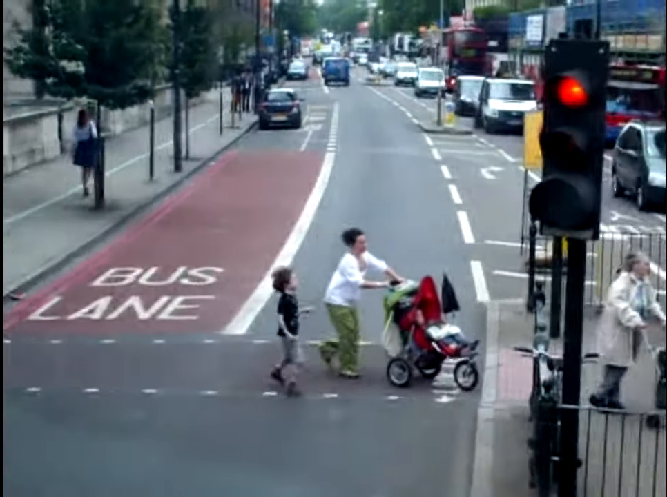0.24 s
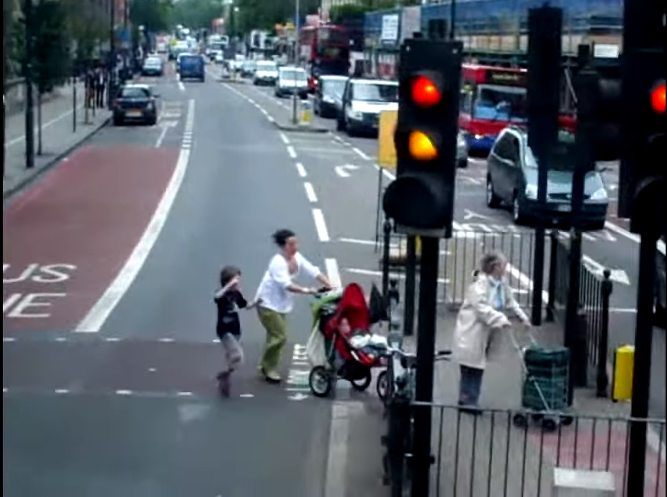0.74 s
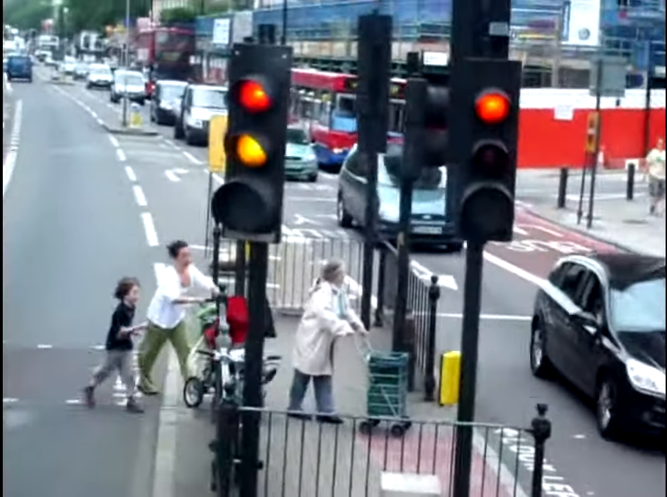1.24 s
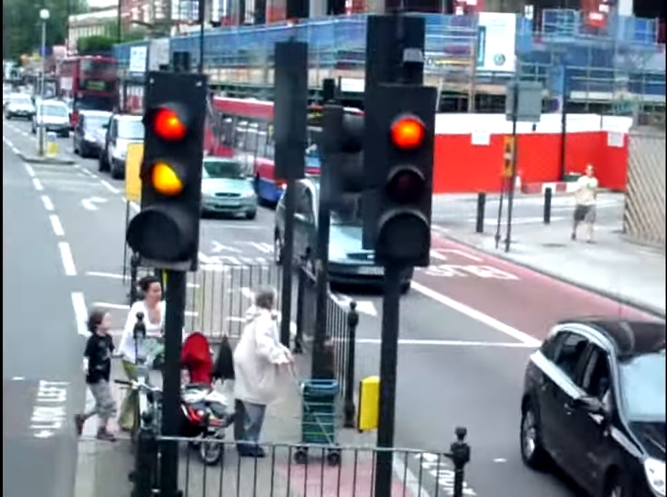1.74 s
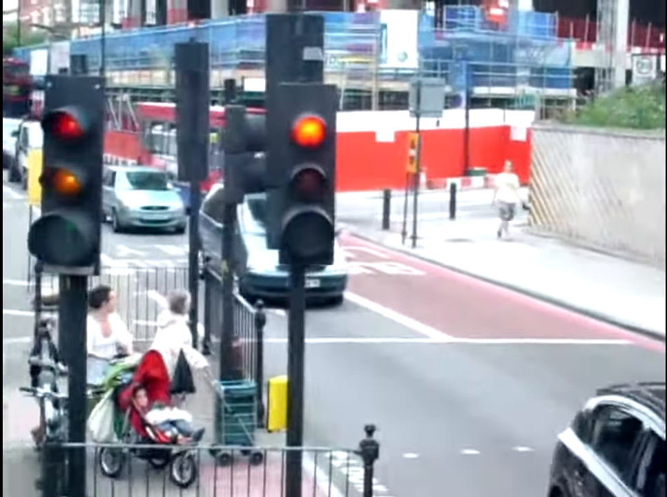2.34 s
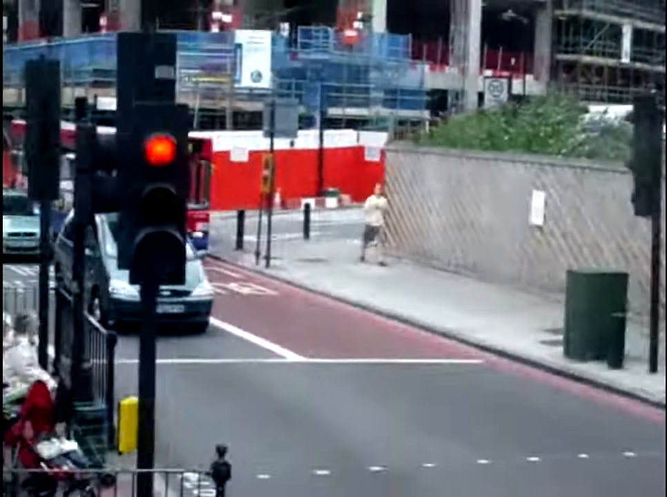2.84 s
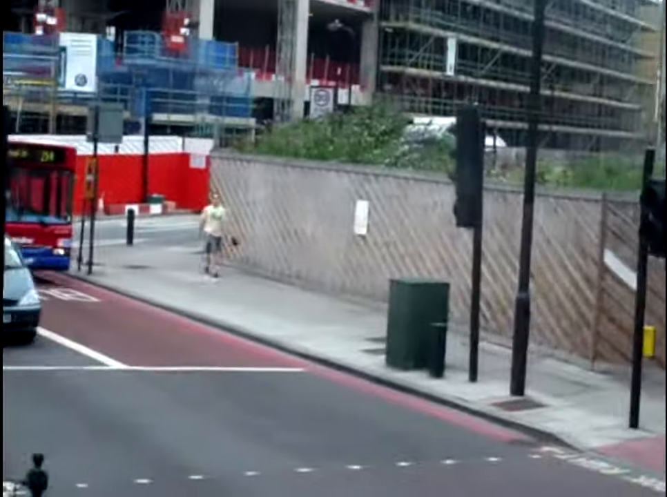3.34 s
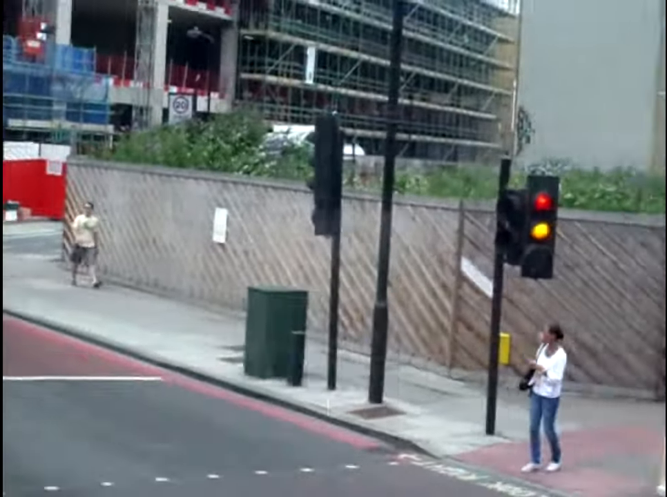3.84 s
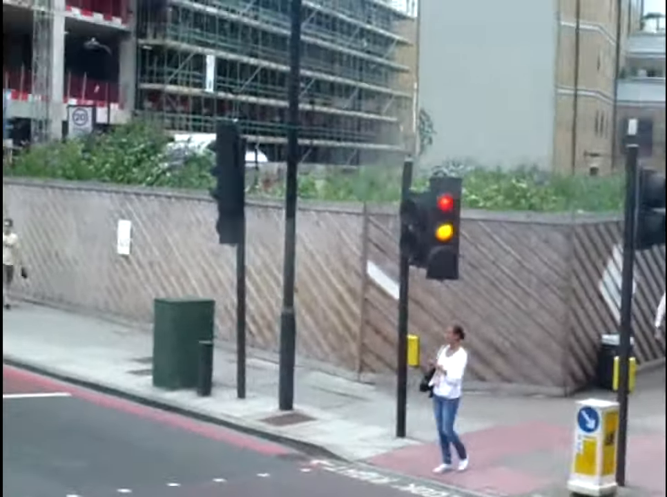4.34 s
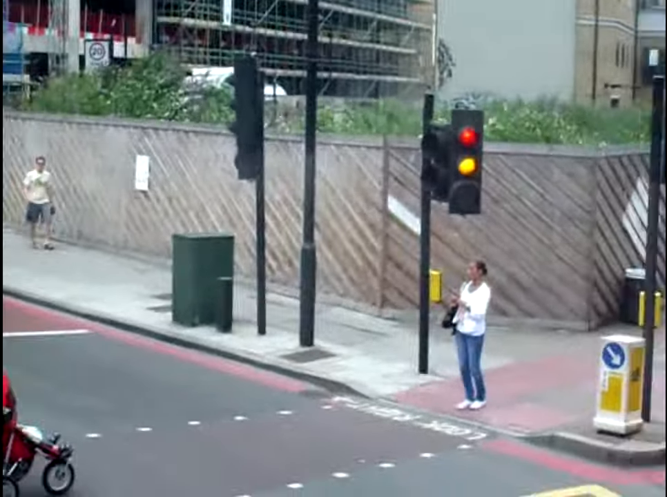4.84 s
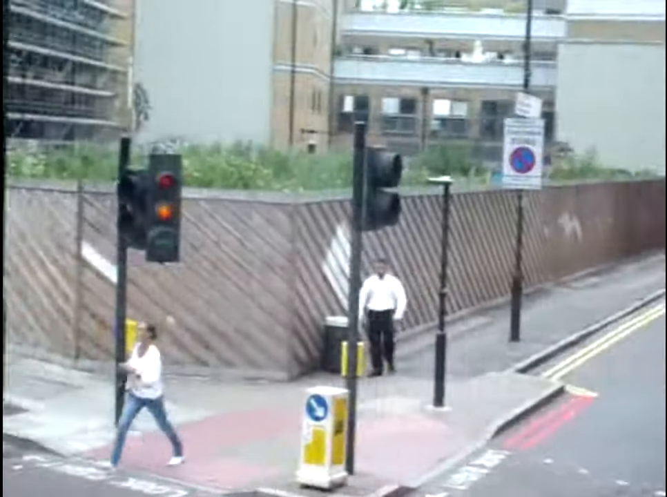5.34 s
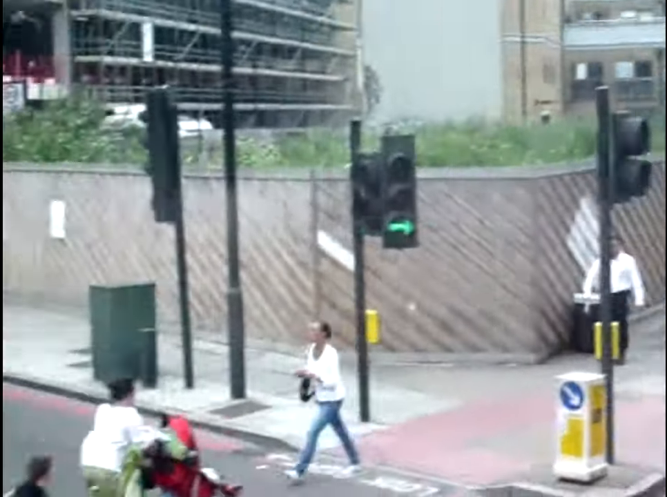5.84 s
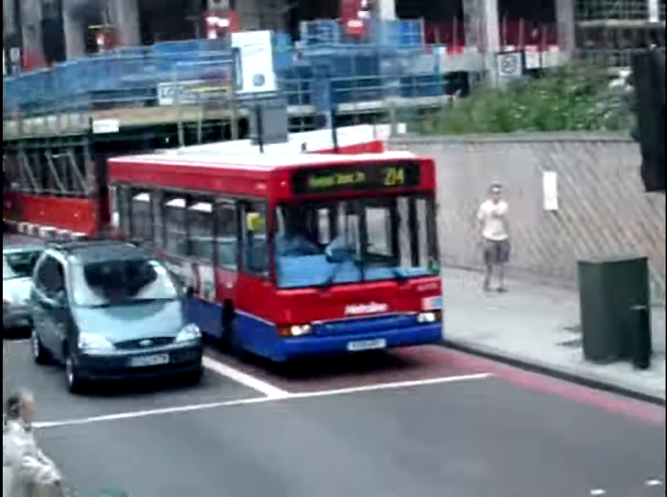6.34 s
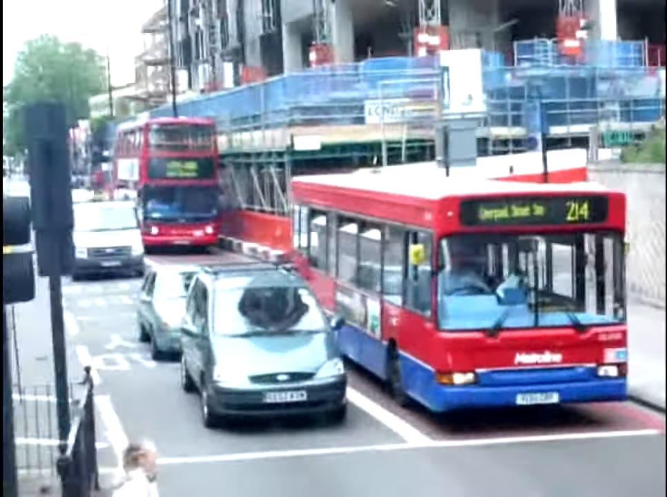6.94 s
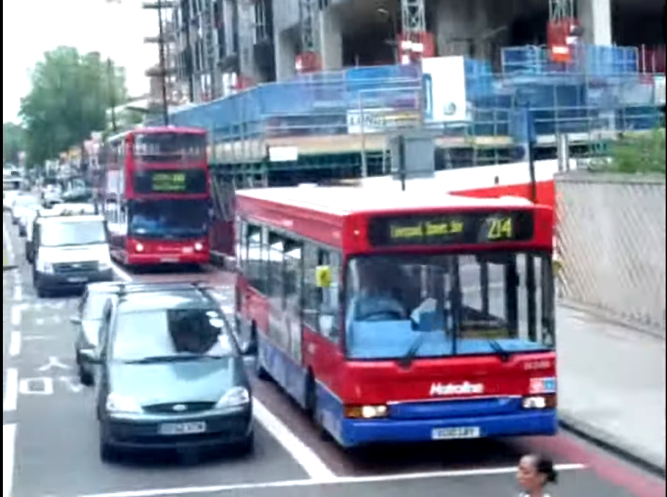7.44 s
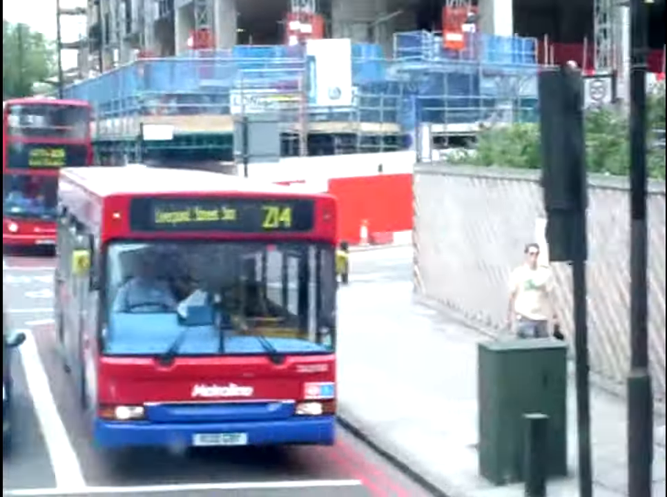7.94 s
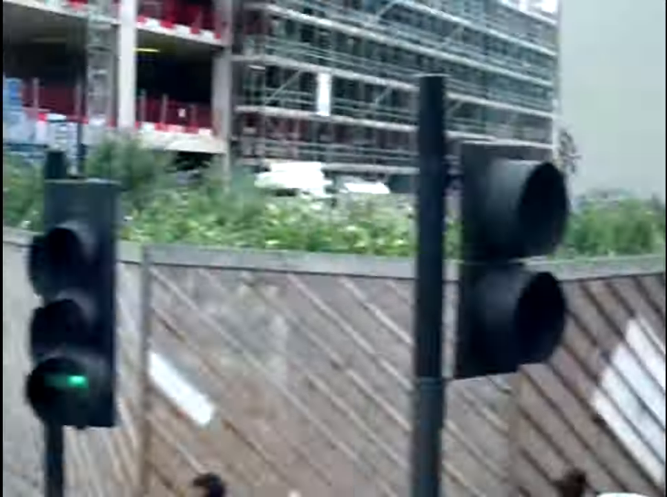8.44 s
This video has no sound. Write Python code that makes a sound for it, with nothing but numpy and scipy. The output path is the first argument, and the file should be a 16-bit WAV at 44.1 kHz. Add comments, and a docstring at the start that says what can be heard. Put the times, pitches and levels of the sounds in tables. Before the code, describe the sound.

Heard from a seat inside a diesel bus at a city junction: a deep throbbing idle with a thin wavering gear whine. The whine breaks up as the bus pulls away, revs climbing steadily, panels buzzing and trim rattling. A vehicle alongside revs twice, street noise swells past, and small brake chirps squeak near the end.

```python
"""On board a diesel bus at city traffic lights: it idles with a thin gear whine, then pulls away and the revs climb.
Sines at multiples of the firing rate make the exhaust, whine and panel buzz; shaped noise makes knocks and roar.
A vehicle alongside, a gliding sine, revs twice and moves off; the body shudders and booms in low noise.
Bursts of noise make rattling trim, ticking fittings and a soft puff; street and tyre noise swells past.
Wavering sines make a street note, squeals, whines and engine hums, and the chirps of a brake near the end."""
import sys
import numpy as np
from scipy import signal
from scipy.fft import rfft, irfft, next_fast_len
from scipy.io import wavfile
from scipy.ndimage import map_coordinates

SR = 44100
rng = np.random.default_rng(int(sys.argv[2]) if len(sys.argv) > 2 else 0)


def unload_wav(signal):
    """Save mono or channel-first audio to the path in sys.argv[1] as 16-bit WAV at rate SR, clipped to [-1, 1]."""
    wavfile.write(
        sys.argv[1],
        SR,
        np.round(np.clip(np.atleast_2d(signal).T, -1, 1) * 32767).astype(np.int16),
    )


N = 383669  # length in samples


def amp(db):
    """Decibels to gain."""
    return 10 ** (np.asarray(db) / 20)


def unit(x):
    """Scaled to rms 1."""
    return x / np.sqrt(np.mean(x ** 2) + 1e-20)


def curves(rows):
    """One value per sample for each column after the time, in straight lines between the rows."""
    s, *columns = np.transpose(rows)
    return [np.interp(np.arange(N) / SR, s, column) for column in columns]


def wobble(rate):
    """A smooth random curve, with rate random points a second."""
    points = rng.standard_normal(int(N * rate / SR) + 4)
    return map_coordinates(points, [np.arange(N) * rate / SR])


def ramp(s, length):
    """A straight rise from 0 to 1 that starts at time s."""
    return np.clip((np.arange(N) / SR - s) / length, 0, 1)


def bump(s, width):
    """A bell of height 1 around time s."""
    return np.exp(-((np.arange(N) / SR - s) / width) ** 2)


def fade(s, t60, attack):
    """A quick rise at time s and an exponential decay, by 60 dB in t60 seconds."""
    t = np.maximum(np.arange(N) / SR - s, 0)
    return (1 - np.exp(-t / attack)) * np.exp(-np.log(1000) * t / t60)


def lift(hz, modes):
    """Decibels that a note gains (or loses) near resonances."""
    return sum(db / (1 + ((hz - centre) / width) ** 2) for centre, width, db in modes)


def coloured(x, points):
    """x through a filter drawn by (Hz, dB) points on a log pitch axis."""
    m = next_fast_len(N + SR // 2)
    f, db = np.transpose(points)
    hz = np.fft.rfftfreq(m, 1 / SR)
    gain = amp(np.interp(np.log(hz + 1), np.log(f), db, left=-120, right=-120))
    return irfft(rfft(x, m) * gain, m)[:N]


def rush(points):
    """Noise of rms 1 whose spectrum has the given shape."""
    return unit(coloured(rng.standard_normal(N), points))


def tone(hz):
    """A sine of rms 1 that follows a pitch curve."""
    return np.sqrt(2) * np.sin(2 * np.pi * (np.cumsum(hz) / SR + rng.random()))


# The first four multiples of the firing rate, before resonances and surges.
# Each row: level in dB at idle, level in dB under load, dB added by the pull from rest.
FIRING_ORDERS = [(-27, -33.5, 0.5), (-34.5, -35.5, -2.5), (-39.5, -50, 3), (-57.5, -60.5, 1.5)]
# Weak notes from unequal cylinders, before the body's lift.
# Each row: multiple of the firing rate, level in dB at idle, level in dB under load.
UNEVEN_ORDERS = [(1 / 3, -42, -38), (1 / 2, -48, -35), (2 / 3, -53, -46), (5 / 6, -48, -48),
                 (3 / 2, -37.5, -44), (5 / 3, -45, -50), (7 / 3, -57, -47), (5 / 2, -44, -48),
                 (10 / 3, -46.5, -54), (7 / 2, -47.5, -54)]
# Air resonances and a null of the cabin. Each row: pitch in Hz, half width in Hz, lift in dB.
CABIN_MODES = [(44.3, 3.8, 8), (56.84, 2.1, 15), (83, 4, -3), (112.1, 3.8, 7), (126.4, 4.2, 5.5),
               (138.36, 3.95, 13), (150.3, 3.2, 10), (178, 6, 5.5), (200.6, 11, 16)]
# The body sways with a weak note near its own. Each row: pitch in Hz, half width in Hz, lift in dB.
BODY_MODE = [(25, 7.8, 9.5)]
# The exhaust note surges and slackens. Each row: middle in seconds, half length in seconds, change in dB.
SURGES = [(3.599, 0.093, 7), (4.094, 0.092, 4), (4.303, 0.14, -4.5), (5.027, 0.11, -4), (5.368, 0.098, 3),
          (7.801, 0.067, -6.5), (8.138, 0.18, 5), (8.71, 0.049, -10.5)]
PULL_S, PULL_WIDTH_S = 4.29, 0.51  # the engine labours hardest as it pulls from rest
CRANK_JITTER_RAD = .08


def exhaust(firing, load):
    """Low firing orders throb as they cross cabin resonances; unequal cylinders add orders between them."""
    crank = 2 * np.pi * np.cumsum(firing) / SR + CRANK_JITTER_RAD * wobble(22)
    surge_db = sum(db * bump(s, width) for s, width, db in SURGES)
    pull = bump(PULL_S, PULL_WIDTH_S)
    out = np.zeros(N)
    for k, (idle_db, load_db, pull_db) in enumerate(FIRING_ORDERS, 1):
        level_db = idle_db + load * (load_db - idle_db) + pull * pull_db
        level_db = level_db + lift(k * firing, CABIN_MODES) + surge_db + .6 * wobble(14)
        out += amp(level_db) * np.sqrt(2) * np.cos(k * crank)
    for order, idle_db, load_db in UNEVEN_ORDERS:
        level_db = idle_db + load * (load_db - idle_db) + lift(order * firing, BODY_MODE)
        out += amp(level_db + 3.8 * wobble(8)) * tone(order * firing)
    return out


# Ring of the engine block under each firing. Each row: pitch in Hz, relative level in dB.
BLOCK_RING = [(120, -38), (220, -2.5), (265, 1.5), (300, -2.5), (350, 0.5), (500, -2), (750, -18.5),
              (1200, -13.5), (3000, -41)]


def block(firing, roar_db, load, scatter_db=3.5, cylinder_db=3, count=6):
    """Each firing knocks the block; strength follows a pattern over six firings, plus random scatter."""
    at = np.flatnonzero(np.diff(np.floor(np.cumsum(firing) / SR)))
    cylinder = np.cos(2 * np.pi * np.arange(len(at)) / count)
    strength_db = cylinder_db * cylinder + scatter_db * rng.standard_normal(len(at))
    knocks = np.zeros(N)
    knocks[at] = amp(strength_db) / np.sqrt(firing[at])
    # the cabin smears every knock over some tens of milliseconds
    t = np.arange(SR // 4) / SR
    smear = rng.standard_normal(len(t)) * np.exp(-t / 0.024)
    ring = signal.fftconvolve(knocks, smear)[:N]
    return amp(roar_db - 10.5 + 0.5 * load) * unit(coloured(ring, BLOCK_RING))


# Combustion roar at idle. Each row: pitch in Hz, relative level in dB per Hz.
ROAR_IDLE = [(70, -27), (120, 1.5), (160, -1.5), (260, -1.5), (300, -4.5), (345, 2), (450, -5), (560, -3),
             (700, -14), (900, -21.5), (1400, -28)]
# Combustion roar under load. Each row: pitch in Hz, relative level in dB per Hz.
ROAR_LOAD = [(70, -19.5), (130, 1.5), (200, -1.5), (260, 2.5), (300, -3), (345, 1), (440, -1.5),
             (520, -2.5), (700, -10), (900, -14), (1400, -34.5)]
# Valve clatter and hiss. Each row: pitch in Hz, relative level in dB per Hz.
HISS = [(900, -28.5), (1500, -0.5), (2100, 3), (2600, -1.5), (3200, -6), (3800, -6.5), (4500, -13),
        (5500, -22), (7000, -28.5), (8000, -38), (10000, -49.5)]


def roar(firing, load, roar_db, hiss_db):
    """Combustion roar and valve clatter pulse with the firings; the roar deepens under load."""
    beat = np.cos(2 * np.pi * np.cumsum(firing) / SR)
    body = np.sqrt(1 - load) * rush(ROAR_IDLE) + np.sqrt(load) * rush(ROAR_LOAD)
    low = amp(roar_db + 0.7 * wobble(9)) * (1 + 0.04 * beat) * body
    high = amp(hiss_db + 0.26 * wobble(12)) * (1 + 0.085 * beat) * rush(HISS)
    return low + high


# Shudder of the body on its springs. Each row: pitch in Hz, relative level in dB per Hz.
SHUDDER = [(8, -21), (16, -6.5), (24, -2), (36, -9.5), (55, -9.5), (110, -23.5), (200, -69.5)]
# Boom of the cabin air. Each row: pitch in Hz, relative level in dB per Hz.
CABIN_BOOM = [(25, -29.5), (42, -10), (52, 6), (60, -8.5), (68, -8.5), (85, -6), (115, -15.5), (150, -29.5),
              (250, -51.5)]
# The body takes a jolt. Each row: start in seconds, level in dB, time to die by 60 dB in seconds.
JOLTS = [(4.2, -35, 1.97), (5.3, -18.5, 1.6), (8.019, -22.5, 2.5)]
# The boom swells near this firing rate. Each row: firing rate in Hz, half width in Hz, lift in dB.
BOOM_SWELL = [(67, 8.1, 6)]
SHUDDER_DB, SHUDDER_REVS_DB = -34.5, 8.5  # at the lowest revs, added at the highest
BOOM_DB, BOOM_REVS_DB = -39, 9.5  # likewise, before the swell


def bodywork(firing):
    """The body shudders on its springs and the cabin air booms, both more as the revs climb."""
    revs = (firing - firing.min()) / np.ptp(firing)
    jolts = sum(amp(db) * fade(s, t60, attack=.02) for s, db, t60 in JOLTS)
    shudder = amp(SHUDDER_DB + SHUDDER_REVS_DB * revs) + jolts
    boom_db = BOOM_DB + BOOM_REVS_DB * revs + lift(firing, BOOM_SWELL)
    return shudder * rush(SHUDDER) + amp(boom_db) * rush(CABIN_BOOM)


# Cabin panels that ring with the higher firing orders. Each row: pitch in Hz, relative level in dB.
PANELS = [(130, -10.5), (165, -15), (200, -6), (225, -9.5), (258, -2), (280, -5.5), (305, -22), (328, -14),
          (352, -9), (395, -10), (440, -5.5), (490, -13.5), (535, -6), (580, -9), (660, -13.5), (800, -17)]
PANEL_FLUTTER = .002  # as a share of the pitch


def panels(firing, roar_db, order=4, count=9):
    """Higher firing orders flare up raggedly as they cross the panel resonances."""
    buzz = np.zeros(N)
    for k in range(order, order + count):
        hz = k * firing * (1 + PANEL_FLUTTER * wobble(40))
        buzz += amp(2.5 * wobble(12)) * tone(hz)
    return amp(roar_db - 10) * coloured(buzz, PANELS)


# The gear whine dies away as the bus starts to roll. Each row: time in seconds, level in dB before its waver.
WHINE = [(0, -46), (0.95, -42), (1.4, -44.5), (1.85, -42.5), (2.2, -39), (2.55, -44.5), (2.85, -42.5),
         (3.02, -50), (3.13, -45), (3.23, -49), (3.37, -40.5), (3.46, -54), (4, -75)]
WHINE_WAVER_DB, WHINE_GRIT_DB = 1.4, 1.3  # slow and fast random changes in level


def gear_whine(firing, load, order=23):
    """A gear sings at a fixed multiple of the firing rate; it wavers, and breaks up as it takes the load."""
    whine_db, = curves(WHINE)
    waver_db = WHINE_WAVER_DB * wobble(15) + WHINE_GRIT_DB * wobble(66)
    flutter = 0.0022 * wobble(30) + 0.015 * load * wobble(70)
    return amp(whine_db + waver_db) * tone(order * firing * (1 + flutter))


# Street noise. Each row: pitch in Hz, relative level in dB per Hz.
STREET = [(300, -17.5), (550, -2.5), (700, 5), (860, 0), (990, -0.5), (1080, 1), (1180, -5), (1400, -5.5),
          (1600, -11), (1900, -14.5), (2800, -33.5), (3900, -28.5), (5500, -43), (7000, -52.5)]
# A wavering street note comes and goes. Each row: start in seconds, length in seconds, peak dB before waver.
DRONE = [(3.8, 0.11, -37.5), (4.05, .3, -43), (4.4, .3, -37), (4.674, 0.12, -31.5), (4.761, 0.39, -38.5),
         (5.1, .28, -38), (5.36, 0.37, -36), (5.8, 0.41, -45), (6.104, 0.11, -42)]
GRAIN_DB = 0.94  # coarse grain of the traffic when it is close


def street(street_db, traffic):
    """Traffic noise swells past, coarser when close, with a wavering note in it."""
    swells = sum(amp(db) * np.sin(np.pi * ramp(s, length)) for s, length, db in DRONE)
    drone = swells * amp(1.3 * wobble(30)) * tone(756 + 5 * wobble(60))
    grain_db = GRAIN_DB * traffic * wobble(140)
    return drone + amp(street_db + 0.55 * wobble(7) + grain_db) * rush(STREET)


# Squeals, whines and engine hums, before flutter. Each row: start in seconds, length in seconds,
# start pitch in Hz, end pitch in Hz, peak level in dB.
SQUEALS_AND_HUMS = [(0.5, 0.44, 1410, 1414, -53.5), (1.093, 0.65, 1440, 1443, -55.5),
                    (1.603, 0.55, 1365, 1423, -53), (2.2, 0.4, 1415, 1413, -58.5),
                    (1.635, 0.26, 2745, 2800, -62), (1.932, 0.38, 2800, 2770, -60),
                    (3.683, 0.37, 258, 289.4, -46.5), (4.582, 0.33, 691, 722, -41.5),
                    (4.85, .85, 1415, 1414, -52), (5.201, 1.1, 2423, 2806, -59),
                    (5.697, 0.357, 695, 671, -42), (5.75, .5, 256, 257.1, -42), (6.071, .36, 725, 684, -44),
                    (6.101, 0.32, 349, 347, -38.5), (6.17, 0.22, 526, 513, -40),
                    (6.5, 0.52, 1345, 1320, -54), (6.55, 0.598, 250, 268.5, -38.5),
                    (7.05, .35, 500, 505, -42.5), (7.49, .42, 159.7, 175.4, -33.5),
                    (7.531, 0.538, 344.5, 324, -39), (7.62, .5, 278, 281.5, -41),
                    (8.021, 0.48, 448, 498, -38.5), (8.296, 0.396, 348, 388.5, -40.5)]


def squeals_and_hums():
    """Squeals, whines and engine hums swell, glide and flutter: sines that bend from one pitch to another."""
    out = np.zeros(N)
    flutter, swell_db = 1 + .006 * wobble(70), 1.5 * wobble(32)
    for s, length, start_hz, end_hz, db in SQUEALS_AND_HUMS:
        u = ramp(s, length)
        hz = (start_hz + u * (end_hz - start_hz)) * flutter
        arch = 2 * np.sqrt(u * (1 - u))
        out += amp(db + swell_db) * arch * tone(hz)
    return out


# Ticks of loose fittings, and one longer soft puff. Each row: start in seconds, level in dB before the fade,
# time to die by 60 dB in seconds, brightness in dB per octave.
TICKS_AND_PUFF = [(2.164, -48, .03, 7.5), (4.287, -31.5, 0.04, -4), (4.296, -41, .03, -4),
                  (4.931, -40.5, 0.02, 8), (6.739, -45, 0.05, -2), (8.125, -45, 0.8, 0.5),
                  (8.244, -42.5, 0.046, 3.5)]
# Their sound before it is made duller or brighter. Each row: pitch in Hz, relative level in dB.
FITTING = [(400, -13.5), (1400, 1.5), (2600, 2), (3900, -6.5), (5500, -14.5), (8000, -40.5), (10000, -59)]
TILT_PIVOT_HZ = 2500  # the pitch that brightness leaves alone


def fittings():
    """Loose fittings tick in short bursts of noise, dull or bright; one longer soft puff comes near the end."""
    out = np.zeros(N)
    for s, db, t60, tilt in TICKS_AND_PUFF:
        tilted = [(hz, level + tilt * np.log2(hz / TILT_PIVOT_HZ)) for hz, level in FITTING]
        out += amp(db) * fade(s, t60, attack=0.0003) * rush(tilted)
    return out


# Exhaust of the vehicle alongside. Each row: time in seconds, firing rate in Hz, level in dB before wobble.
NEIGHBOUR = [(2.7, 36.67, -51), (2.98, 39.9, -22), (3.6, 41.24, -24.5), (3.77, 52.5, -20.5),
             (3.92, 65.3, -28), (4.1, 51.6, -29), (4.22, 52.9, -18.5), (4.36, 63.14, -26.5),
             (4.53, 64.5, -26.5), (4.8, 47.2, -20.5), (5.02, 40.5, -32.5), (5.45, 37.75, -33),
             (5.7, 44.15, -27), (6.02, 50.34, -20.5), (6.26, 57.03, -22), (6.7, 70.2, -26.5),
             (7, 76.9, -28.5), (7.4, 80, -54)]


def neighbour():
    """The exhaust of the vehicle alongside, one sine: two blips of the throttle, a rest, then it draws away."""
    hz, db = curves(NEIGHBOUR)
    return amp(db + wobble(11)) * tone(hz)


# Ring of the loose trim. Each row: pitch in Hz, relative level in dB.
TRIM = [(450, -14.5), (700, -0.5), (1080, 0.5), (1400, -4.5), (1900, -2.5), (2800, -16), (3900, -15.5),
        (5500, -34), (8000, -55.5)]
RATTLE_PER_S, RATTLE_SCATTER_DB = 90, 3  # average knocks a second, and their unevenness
RATTLE_DB, RATTLE_DECAY_S = -48, 0.0034  # level at the strongest moment, time constant of a knock
RATTLE_S, RATTLE_WIDTH_S = 4.9, 1  # when it is strongest, and how wide the swell is


def rattle():
    """Loose trim chatters at random, in knocks of uneven strength, while the engine labours."""
    strength = amp(RATTLE_SCATTER_DB * np.clip(rng.standard_normal(N), -2, 1))
    hits = (rng.random(N) < RATTLE_PER_S / SR) * strength
    t = np.arange(SR // 20) / SR
    bursts = signal.fftconvolve(hits, np.exp(-t / RATTLE_DECAY_S))[:N] * rng.standard_normal(N)
    return amp(RATTLE_DB) * bump(RATTLE_S, RATTLE_WIDTH_S) * unit(coloured(bursts, TRIM))


# Hiss of passing tyres. Each row: pitch in Hz, relative level in dB per Hz.
TYRE_HISS = [(2500, -20), (3600, 2.5), (4400, -1), (5600, -12.5), (7500, -23), (9000, -45)]
TYRES_S, TYRES_WIDTH_S, TYRES_DB = 5.75, .4, -59  # tyres hiss past close by


def tyres():
    """A short swell of tyre hiss, made of noise."""
    return amp(TYRES_DB) * bump(TYRES_S, TYRES_WIDTH_S) * rush(TYRE_HISS)


# Brake chirps. Each row: start in seconds, strength in dB before the fade and the disc,
# time to die by 60 dB in seconds.
CHIRPS = [(8.135, -58, 0.3), (8.172, -57, .12), (8.228, -53, 0.28), (8.449, -46.5, 0.27), (8.497, -61, .2),
          (8.56, -61, 0.34), (8.612, -62, 0.6)]
# Notes of the brake disc. Each row: pitch in Hz before it trembles, relative level in dB.
DISC = [(3455, -0.5), (3531, -2), (7574, -26)]


def brake():
    """A brake pad catches a few times and rings its disc, whose notes tremble in pitch."""
    grip = sum(amp(db) * fade(s, t60, attack=0.0037) for s, db, t60 in CHIRPS)
    return grip * sum(amp(db) * tone(hz + 11 * wobble(200)) for hz, db in DISC)


# The engine idles, then climbs. Each row: time in seconds, firing rate in Hz.
ENGINE_SPEED = [(0, 32.9), (2.55, 32.66), (3.05, 32.8), (3.38, 36.4), (3.6, 38.3), (4, 43.3), (4.5, 48.4),
                (5.25, 54), (6, 58.9), (6.8, 65.1), (7.25, 67.9), (7.75, 69.5), (8.1, 71.6), (8.7, 77.5)]
IDLE_HZ, FULL_LOAD_HZ = 33, 67  # firing rates where the load starts and is full
LOAD_POWER = .45  # the load comes in early in the climb
THROTTLE_S, THROTTLE_RISE_S = 2.63, 1.67  # the throttle starts to open, and takes this long
ROAR_DB, ROAR_THROTTLE_DB, ROAR_LOAD_DB = -40, 5, 3  # at idle, added by full throttle, added by full load
HISS_DB, HISS_THROTTLE_DB = -52, 5  # clatter and hiss: at idle, added by full throttle
STREET_DB, STREET_THROTTLE_DB = -44.5, 3  # the street: at rest, added on the move
TRAFFIC_S, TRAFFIC_RISE_S, TRAFFIC_HOLD_S, TRAFFIC_FALL_S = 2.31, 2.02, 1.5, 0.42  # traffic swells past
TRAFFIC_DB, TRAFFIC_HISS_DB = 6.5, -0.2  # what it adds to the street and to the hiss
ONCOMING_S, ONCOMING_WIDTH_S, ONCOMING_DB = 8.3, 0.74, 3.5  # a bus comes the other way


def scene():
    """Engine, bodywork and street as heard from a seat; throttle and load set the levels."""
    firing, = curves(ENGINE_SPEED)
    load = np.clip((firing - IDLE_HZ) / (FULL_LOAD_HZ - IDLE_HZ), 0, 1) ** LOAD_POWER
    throttle = ramp(THROTTLE_S, THROTTLE_RISE_S)
    leaving_s = TRAFFIC_S + TRAFFIC_RISE_S + TRAFFIC_HOLD_S
    traffic = ramp(TRAFFIC_S, TRAFFIC_RISE_S) - ramp(leaving_s, TRAFFIC_FALL_S)
    oncoming = bump(ONCOMING_S, ONCOMING_WIDTH_S)
    roar_db = ROAR_DB + ROAR_THROTTLE_DB * throttle + ROAR_LOAD_DB * load
    hiss_db = HISS_DB + HISS_THROTTLE_DB * throttle + TRAFFIC_HISS_DB * traffic
    street_db = STREET_DB + STREET_THROTTLE_DB * throttle + TRAFFIC_DB * traffic + ONCOMING_DB * oncoming
    bass = exhaust(firing, load) + bodywork(firing) + neighbour()
    engine = block(firing, roar_db, load) + roar(firing, load, roar_db, hiss_db) + gear_whine(firing, load)
    cabin = panels(firing, roar_db) + fittings() + rattle()
    others = street(street_db, traffic) + tyres() + squeals_and_hums() + brake()
    return (bass + engine + cabin + others)[None]


TOP_HZ = 9600


def record(dry):
    """Softens the very start and end, and keeps nothing from TOP_HZ up."""
    m = next_fast_len(N + SR // 2)
    gate = signal.windows.tukey(N, .001)
    kept = np.fft.rfftfreq(m, 1 / SR) < TOP_HZ
    return irfft(rfft(dry * gate, m) * kept, m)[:, :N]


dry = scene()
out = record(dry)
unload_wav(out)
```